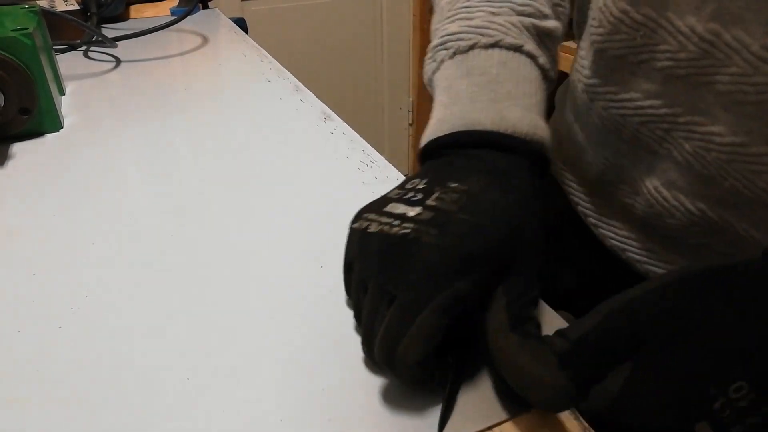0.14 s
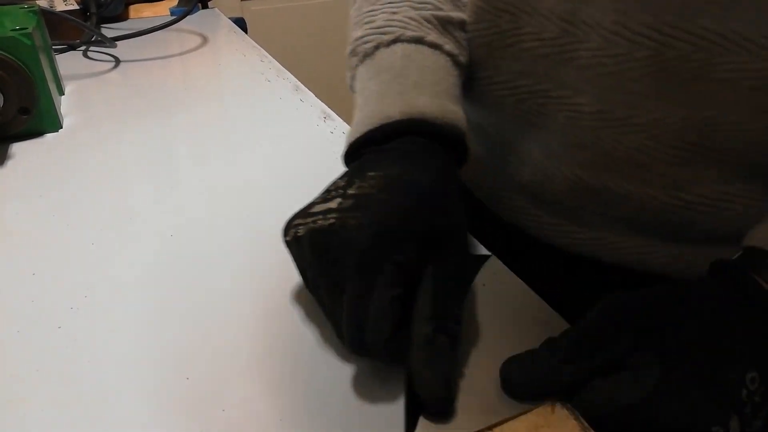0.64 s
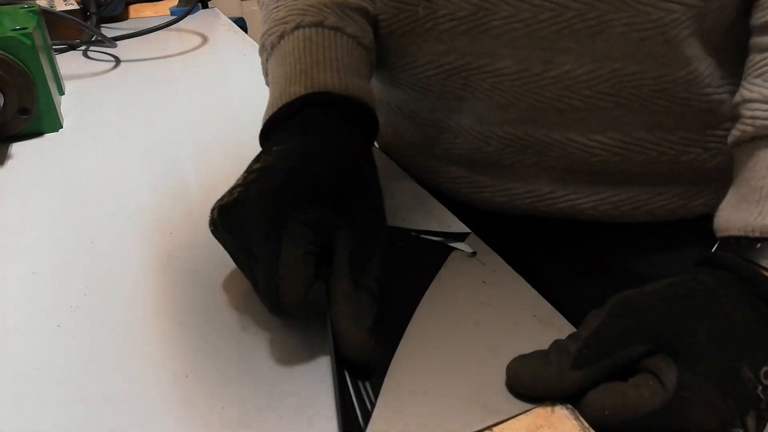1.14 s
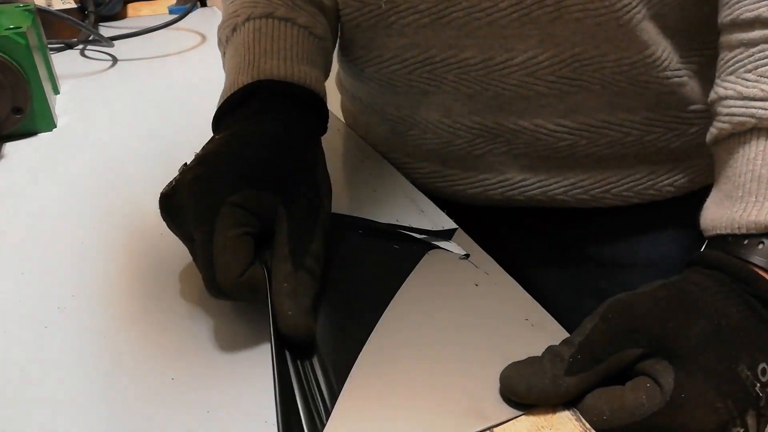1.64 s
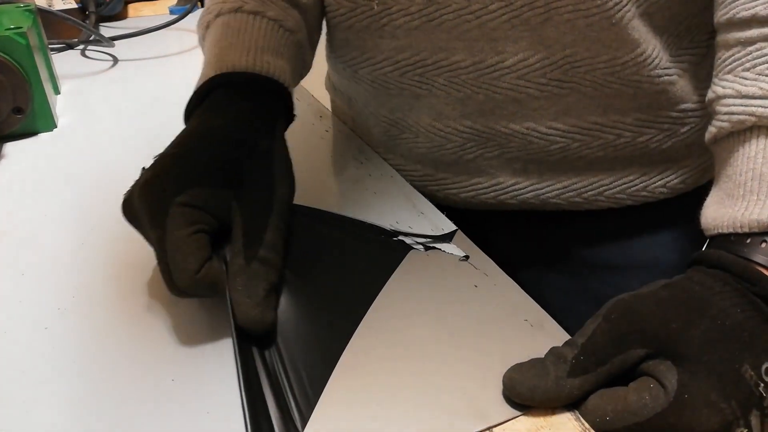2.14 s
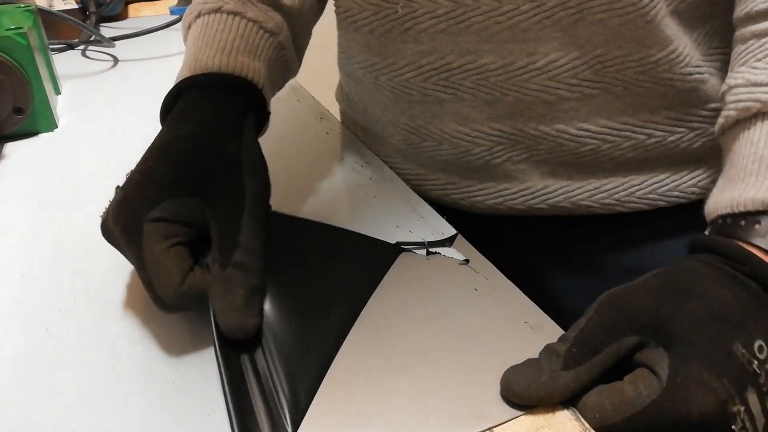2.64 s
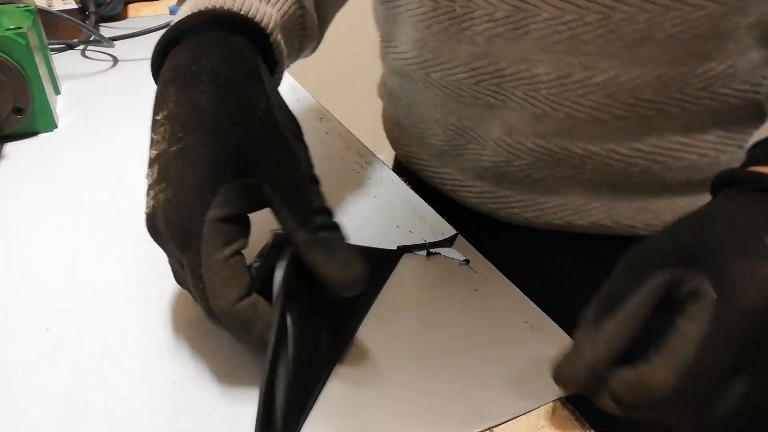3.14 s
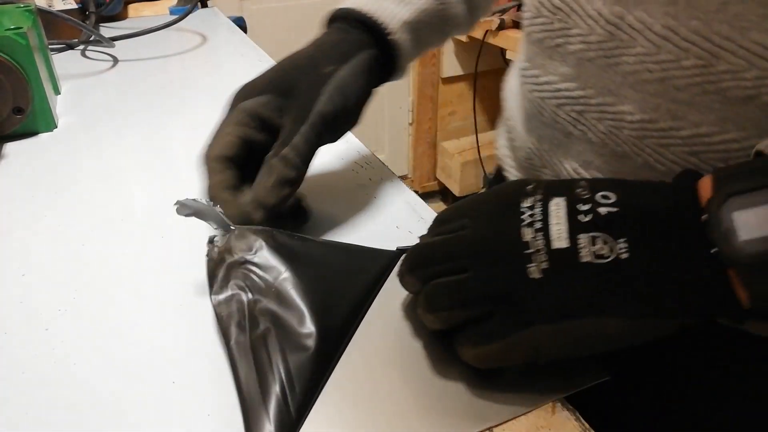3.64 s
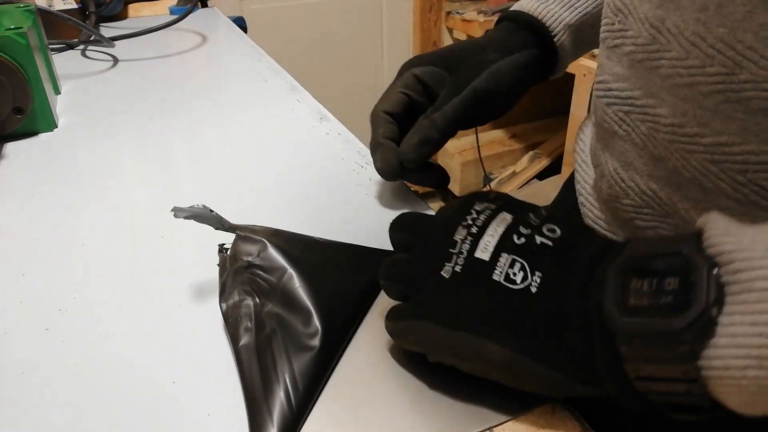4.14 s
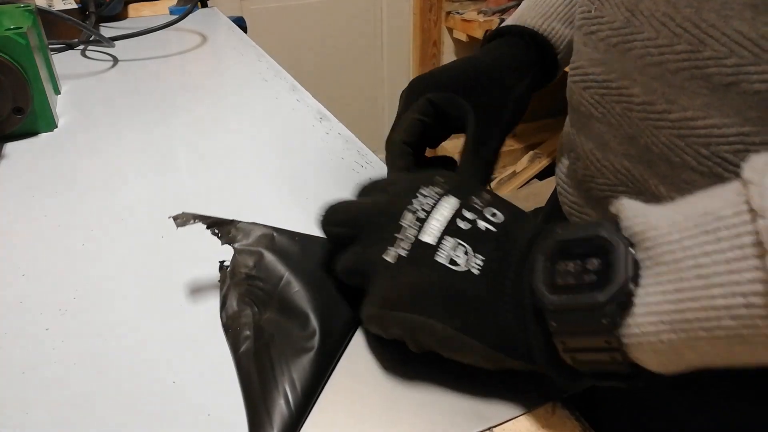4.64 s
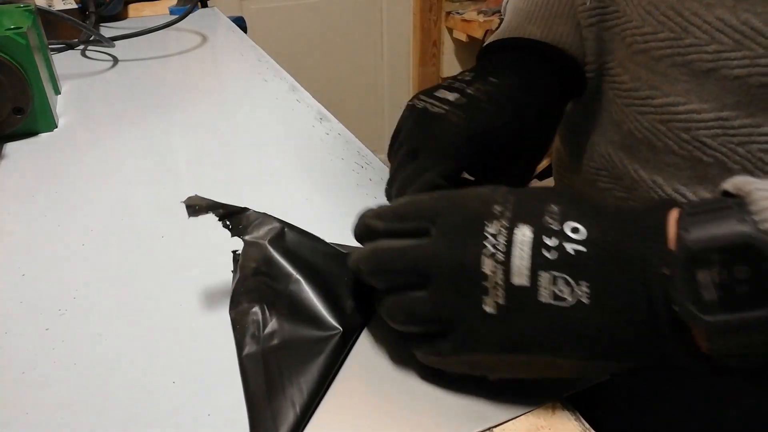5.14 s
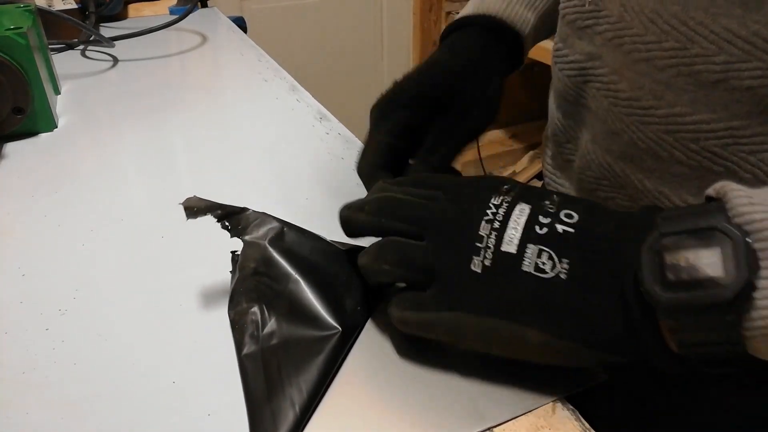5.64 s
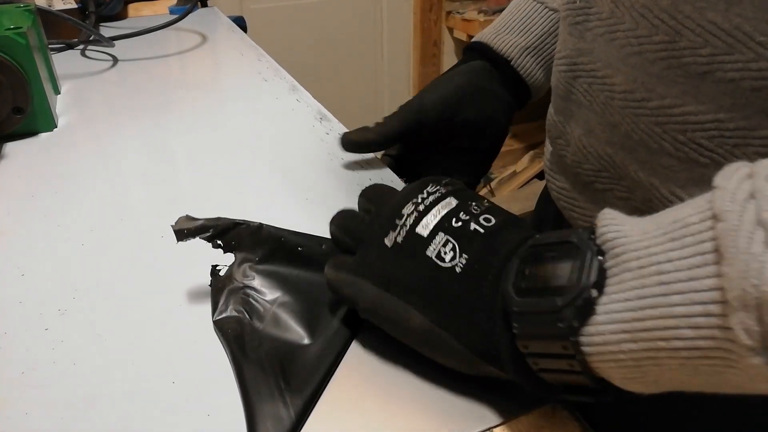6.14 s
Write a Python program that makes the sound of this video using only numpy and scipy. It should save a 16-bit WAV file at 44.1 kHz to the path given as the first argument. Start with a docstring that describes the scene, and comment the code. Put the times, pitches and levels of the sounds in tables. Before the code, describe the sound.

Adhesive film lets go of sheet metal in uneven jerks: one loud crack, a cluster of bright snaps, then thick crinkling and rustling as the film is folded back. The sheet gives soft, low booms under the hands. After a lull, gentler handling crackles and one fuller bump with a pop. Dry, close microphone in a small workshop with quiet background noise.

```python
"""A small workshop: gloved hands peel plastic film off a metal sheet on a bench, close to a two-port microphone.
The glue lets go in sharp snaps, each a short coloured flutter, over crackle made of tiny random releases.
The film squeaks and rubs; the sheet's low modes boom softly when pressed, and noise rings the bench.
Near echoes and a dense room tail answer over a faint hum and quiet, steady noise."""
import sys
import numpy as np
from scipy import signal
from scipy.fft import rfft, irfft, next_fast_len
from scipy.io import wavfile
from scipy.ndimage import uniform_filter1d

SR = 44100
rng = np.random.default_rng(int(sys.argv[2]) if len(sys.argv) > 2 else 0)


def magnitude_from_level(level_db):
    """Linear magnitude for a level in decibels (20 dB per decade)."""
    exponent = np.asarray(level_db, float) / 20
    return 10 ** exponent


def persist_wave(psi):
    """Save psi, clipped to +-1, as 16-bit WAV."""
    counts = np.round(np.clip(psi, -1, 1) * 32767).astype(np.int16)
    wavfile.write(sys.argv[1], SR, np.atleast_2d(counts).T)


N = 276683

# Glue or a crease letting go; colour columns are relative, pan is left minus right ahead of a fixed lean:
# start_s, peak_db, body_db, middle_db (at 4 kHz), pan_db
SNAPS = [(0.225, -28.5, 22, 8, -0.5), (0.274, -37, -12, -14, -2), (0.8175, -26, 2, 12, 0),
         (0.8228, -21, 10, 6, -7.5), (0.8835, -8, -5.5, -9.5, -4.5), (1.181, -32.5, 5, 2, 1),
         (1.8094, -21, 7, 6, 10.5), (1.834, -20.5, -7, -4, 5), (1.8397, -7.5, 6, 5.5, -0.5),
         (1.8997, -30, 6, 2, 15), (1.9188, -14, 4, -2, 2.5), (1.951, -12.5, -6, -3, 5),
         (1.9926, -31, 4, -11, -4), (2.0235, -24.5, 9, -6, -1.5), (2.084, -28, -17, -7, -3),
         (2.1187, -25.5, 8, -4, -1), (2.1441, -11.5, -5, -15, 0), (2.1485, -22, 20, -8, 0.5),
         (2.175, -7, -3, -11.5, 0), (2.246, -32, -4, -4, 0), (2.3108, -34, -6, -2, -4),
         (2.6035, -22, -6, 4.5, 8), (2.7576, -34, 10, 0, 0), (2.859, -22, 16, 5, -8),
         (2.9213, -25.5, -2, -19, -1), (2.934, -20, 11, -10, -3), (2.9615, -24, 3, -6, 0),
         (2.969, -21.5, 6, -2, 5), (3.1221, -28, 9, 8, -8), (3.1338, -21, 13, 8, 10),
         (3.1472, -10, 0, 6, -5.5), (3.163, -28, 14, 0, 0), (3.1943, -26, 14.5, -11, -4.5),
         (3.2884, -30, 14, 0, 0), (3.3849, -14.5, 14, 1, 1), (3.4462, -15, 5, 12, 2.5),
         (3.4705, -29, 7, 8, 0), (3.513, -19.5, 5, 13, 5), (3.548, -18, 5, 14, 3),
         (4.5895, -35, -5, -3, 13), (4.603, -29.5, -5, -8, 9.5), (4.845, -36, 18, 4.5, 1),
         (5.2796, -40.5, -9, -5, 1), (5.3238, -21.5, -43, -26, 8), (5.4633, -45, 14, 0, 0),
         (5.4842, -22, -12.5, -13.5, 3), (5.6275, -13, 4, 3, 1.5), (5.8074, -31, 14, 10, 2),
         (6.0056, -22, 6, 6, 4), (6.1163, -34, 10, 6, 0), (6.152, -30.5, 16, 4, 7)]
# The film edge rings high while taut, lower while slack: time_s, pitch_hz
EDGE_RING = [(0.23, 7000), (0.27, 9600), (2.3, 10000), (2.6, 7100), (3.4, 7760), (3.5, 8700), (5.5, 9000),
             (5.6, 7600)]
# The air pocket under the lifted film, its pitch set by the fold: time_s, pitch_hz
POCKET = [(.225, 1500), (.82, 1280), (.885, 1550), (1.84, 1650), (1.9, 1150), (1.92, 1900), (1.95, 1300),
          (2.02, 1400), (2.148, 1200), (2.175, 1750), (2.25, 1200), (2.77, 1000), (2.86, 1850),
          (2.95, 1300), (3.135, 1750), (3.17, 1650), (3.2, 1300), (3.25, 900), (3.385, 1300), (4.9, 1500),
          (5.6, 1900), (5.81, 1000), (6.15, 1300), (6.25, 1100)]
POCKET_WIDTH_HZ = 220  # half-width of the ring
# Uneven pull and handling of the film, swelling and fading, ahead of the layer trims:
# time_s, level_db, bright_db (fine crackle minus rustle)
PEEL = [(0.0, -66.5, 1), (0.11, -61, 0), (0.21, -65, -4), (0.29, -64, -10), (0.52, -62.5, 3),
        (0.77, -58, 10), (1.03, -63.5, 0), (1.3, -64.5, 4.5), (1.55, -61, -5), (1.76, -66, -10),
        (1.88, -56, -5), (1.96, -55.5, 1), (2.1, -61.5, 4), (2.31, -62, 0), (2.43, -80, 15),
        (2.572, -67.5, 6), (2.605, -54, 4), (2.68, -58, 10), (2.83, -56.5, 3), (3.04, -60.5, 9),
        (3.145, -46, -1), (3.26, -49.5, -2), (3.337, -48.5, -4), (3.425, -55.5, -5), (3.46, -46.5, -4),
        (3.542, -46, 7), (3.62, -62, 10.5), (3.7, -74, 14), (3.89, -71, -2.5), (4.54, -67, 7.5),
        (4.8, -71, -1), (5.3, -81, 14), (5.79, -74, -6), (5.88, -63, 3), (5.96, -67, 4), (6.27, -66, -8)]
# Short crumples and tugs, rise and fall over 20 dB: peak_s, rise_s, fall_s, level_db, bright_db
TUGS = [(.319, .04, 0.18, -55, -5), (.375, .1, .17, -52.5, -14.5), (0.642, .2, .11, -49.5, 10),
        (.819, .008, .35, -47.5, 1), (.89, 0.13, 0.15, -48, 11), (1.187, 0.26, .2, -59.5, -3),
        (1.84, .03, .06, -48, -6), (2.168, 0.07, 0.26, -52.5, 2), (2.362, 0.26, 0.07, -62, 10.5),
        (2.77, 0.09, .16, -48.5, -1.5), (2.903, 0.09, 0.3, -53.5, 16), (2.971, 0.0954, .075, -42.5, 3),
        (3.07, .05, 0.1, -49.5, 11.5), (4.617, .055, 0.14, -51, 8.5), (4.914, .15, .12, -53, -5.5),
        (5.039, .1, 0.17, -57, 9), (5.153, .06, .07, -56, 2), (5.582, .035, .35, -50.5, 2),
        (5.65, 0.03, 0.05, -53, -7.5), (5.74, .3, .025, -56.5, 6), (5.815, .012, .14, -51.5, -1),
        (6.013, 0.13, .1, -56, 2.5), (6.09, .04, .25, -53, 3), (6.163, .02, .06, -43.5, -1),
        (6.243, .02, .12, -55, -22)]
# Glue threads fizz on after a snap: level against its peak, ahead of the layer trim, and time to fall 20 dB
AFTER_DB, AFTER_S = -41, 0.077
# Colour of the glue threads' fine crackle: pitch_hz, level_db (per Hz, relative)
FINE_COLOUR = [(3500, -19.5), (5500, -4), (7500, -1), (10000, -2), (12800, -6), (15700, -17), (16300, -34)]
# Colour of the creases: pitch_hz, level_db (per Hz, relative)
CRINKLE_COLOUR = [(1800, -19.5), (2600, 2.5), (3300, 1.5), (4500, -0.5), (5500, -6), (7500, -35.5)]
# Colour of the slack film on metal: pitch_hz, level_db (per Hz, relative)
RUSTLE_COLOUR = [(250, -29), (450, -11), (800, -3.5), (1100, 3.5), (1700, 4.5), (2200, 0.5), (3200, -24)]
# Whistle of the rubbing film: start_s, end_s, end_pitch_hz, top_pitch_hz, level_db (rms at the top)
SQUEAK = (.38, .49, 12350, 13100, -66)
# Film dragged over an edge sings roughly: peak_s, length_s, pitch_hz, width_hz, level_db
RUBS = [(0.642, 0.048, 2940, 300, -41), (3.26, .2, 850, 600, -53), (4.63, 0.067, 3780, 400, -51.5),
        (5.16, 0.057, 3240, 400, -58), (5.819, 0.027, 10600, 910, -41)]
# The sheet bumped or flexed: peak_s, level_db, push_hz (where it is strongest), spread_octaves, t60_s
KNOCKS = [(0.291, -56, 270, 0.12, 0.38), (0.391, -53, 402, 0.7, 0.16), (0.857, -55, 260, 0.2, 0.21),
          (.995, -59, 450, .3, 0.04), (1.519, -45, 180, 0.12, 0.13), (1.63, -52, 122, 0.54, 0.63),
          (1.7, -52, 49.6, 0.19, 0.24), (1.75, -48.5, 189, 0.37, 0.26), (1.814, -44.5, 760, 0.24, 0.081),
          (1.844, -51, 407, 0.2, 0.25), (1.958, -46, 371, 0.2, 0.12), (2.033, -53, 396, 0.15, 0.16),
          (2.093, -58, 400, .2, .12), (2.126, -50, 500, .4, .1), (2.151, -45, 420, 0.3, 0.2),
          (2.183, -41, 320, 0.12, 0.15), (2.199, -53.5, 192, 0.42, 0.64), (2.41, -61, 132, 0.31, 0.32),
          (2.603, -45.5, 133, .3, 0.34), (2.776, -50, 126, 0.28, 0.31), (2.951, -51.5, 146, 0.44, 0.13),
          (3.199, -48.5, 258, 0.77, 0.23), (3.29, -51.5, 596, 0.72, 0.28), (3.911, -55.5, 159, .25, 0.6),
          (4.617, -52, 130, 0.28, 0.35), (4.722, -58, 60, 0.5, 0.56), (4.898, -57, 133, 0.59, 0.22),
          (5.553, -56, 78, 0.31, 0.11), (5.651, -44.5, 74, 0.14, 0.13), (5.653, -42.5, 760, 0.94, 0.12),
          (5.658, -39, 184, 0.46, 0.28), (5.837, -50, 253, 0.18, 0.15), (5.87, -48.5, 138, 0.31, 0.37),
          (6.256, -44.5, 150, 0.6, 0.27)]
# Low modes of the sheet: pitch_hz
SHEET_HZ = [47, 75, 102, 134, 178, 240, 279, 307, 372, 398, 432, 497, 545, 620, 720, 790, 905, 1010]
# Broad modes of the bench: pitch_hz, width_hz, level_db (relative)
BENCH = [(44, 35, -35), (99.55, 28, -14), (180, 88, 5), (278, 38, -2.5), (426, 65, -8), (710, 970, 4.5)]
# First give, then bench echoes, placed against the snap: delay_s, level_db
NEAR = [(-.0014, -19), (.0023, -12), (.0032, -16), (.0045, -15), (.0075, -21)]
# Decay of the workshop walls: pitch_hz, t60_s
SHOP = [(200, 0.39), (1000, 0.43), (4000, 0.31), (9000, 0.24), (15000, 0.05)]
# Colour difference between the ports: pitch_hz, left_minus_right_db
PORTS = [(200, 0), (700, 4), (1300, -2), (2400, 2), (4400, 4), (8100, 1), (13000, -6)]
LEAD_S = 0.00016  # the left port hears the film first
# Steady workshop hum: pitch_hz, level_db
HUM = (102.3, -79)
# Background colour: pitch_hz, level_db (per Hz, relative)
QUIET = [(20, -4.5), (49, -7), (107, -2), (337, -8.5), (527, -8.5), (1000, -10), (2320, -18),
         (11400, -22.5), (15700, -28), (16300, -44)]
QUIET_DB = -65.5  # rms of the two ports averaged
# Likeness of the background at the two ports: pitch_hz, likeness (-1 to 1)
SAME = [(60, 0.79), (130, 1), (290, 0.37), (640, -0.78), (1400, 0.41), (3100, 0.022)]


def evened(x):
    """Scales to rms 1."""
    return x / np.sqrt(np.mean(x ** 2) + 1e-20)


def read(points, hz):
    """Reads a spectrum table at the given frequencies, along a log pitch axis."""
    f, value = np.transpose(points)
    return np.interp(np.log(hz + 1), np.log(f + 1), value)


def causal(gain_db):
    """Minimum-phase impulse response with the given half-spectrum of gains."""
    log_gain = np.log(magnitude_from_level(np.maximum(gain_db, -70)))
    full = np.concatenate([log_gain, log_gain[-2:0:-1]])
    response = np.fft.ifft(np.exp(full - 1j * signal.hilbert(full).imag)).real
    return response[:len(gain_db)]


def snaps():
    """Each snap is a short flutter of the film edge with its own colour; three groups allow unlike room paths."""
    out = np.zeros((3, 2, N + 2048))
    hz = np.fft.rfftfreq(1024, 1 / SR)
    t = np.arange(40) / SR
    chance = rng.standard_normal((len(SNAPS), 2, 40))
    # The peel line lies nearer the middle, so the left port leads by two samples less
    first = np.eye(40)[[2, 0]]
    for k, ((s, peak_db, body_db, middle_db, pan_db), shake) in enumerate(zip(SNAPS, chance)):
        colour = read([(450, body_db - 18.5), (1500, body_db - 6), (4000, middle_db),
                       (8000, -4.5), (13000, -4.5), (16500, -29)], hz)
        edge_hz = np.interp(s, *np.transpose(EDGE_RING))
        colour += 8 / (1 + ((hz - edge_hz) / 1200) ** 2)
        colour += pocket(s, hz, ring_db=11)
        flutter = first + 0.3 * shake * np.exp(-t / 0.00031)  # a little different at each port
        crack = signal.fftconvolve(flutter, causal(colour)[None], axes=1)
        peak = abs(signal.hilbert(crack)).max(1, keepdims=True)
        crack = magnitude_from_level(peak_db) * crack / peak
        pan = magnitude_from_level(np.array([[pan_db + 2.5], [-3.5 - pan_db]]) / 2)
        at = round(s * SR)
        out[k % 3, :, at:at + crack.shape[1]] += crack * pan
    return out[..., :N]


def pocket(s, hz, ring_db):
    """The trapped air resonates: lift in dB around the pocket's pitch at time s."""
    pocket_hz = np.interp(s, *np.transpose(POCKET))
    return ring_db / (1 + ((hz - pocket_hz) / POCKET_WIDTH_HZ) ** 2)


def film():
    """Three sizes of crackle: glue threads, creases, the slack film on metal."""
    fine_db, crinkle_db, rustle_db = motion()
    fine = crackle(fine_db - 0.5, FINE_COLOUR, per_s=11000, spread_db=3, clump_db=1.2, alike=0.16)
    crinkle = crackle(crinkle_db - 1.7, CRINKLE_COLOUR, per_s=6000, spread_db=2.4, clump_db=2.1, alike=0.26)
    rustle = crackle(rustle_db - 2.3, RUSTLE_COLOUR, per_s=2200, spread_db=3, clump_db=2.0, alike=0.58)
    return fine + crinkle + rustle


def motion():
    """Levels of fine crackle, crinkle and rustle: pull, tugs and after-fizz add up as powers."""
    t = np.arange(0, N, 64) / SR
    lean = np.array([[.5], [0], [-.5]])  # brightness favours the fine crackle over the rustle
    s, db, bright_db = np.transpose(PEEL)
    power = magnitude_from_level(2 * (np.interp(t, s, db) + lean * np.interp(t, s, bright_db)))
    for s, rise, fall, db, bright_db in TUGS:
        drop_db = 20 * np.maximum((s - t) / rise, (t - s) / fall)
        power += magnitude_from_level(2 * (db + lean * bright_db - drop_db))
    for s, db, *_ in SNAPS:
        power[0] += (t > s) * magnitude_from_level(2 * (db + AFTER_DB - 20 * abs(t - s) / AFTER_S))  # fine crackle only
    return [np.interp(np.arange(N) / SR, t, level_db) for level_db in 10 * np.log10(power)]


def crackle(level_db, colour, per_s, spread_db, clump_db, alike):
    """Tiny releases of random size that come in clumps, rung through one colour; the ports share only part."""
    draw = rng.random((2, N))
    size = rng.exponential(1, (2, N))
    sign = np.sign(rng.standard_normal((2, N)))
    slow = uniform_filter1d(uniform_filter1d(rng.standard_normal(N), 300), 300)
    clump = magnitude_from_level(clump_db * evened(slow))
    a, b = (draw < per_s / SR) * sign * magnitude_from_level(spread_db * np.minimum(size, 5)) * clump
    both = np.array([a, alike * a + np.sqrt(1 - alike ** 2) * b])
    ring = causal(read(colour, np.fft.rfftfreq(1024, 1 / SR)))
    rung = signal.oaconvolve(both, ring[None], axes=1)[:, :N]
    return magnitude_from_level(level_db) * patchy(rung, patchy_db=2.0)


def patchy(x, patchy_db):
    """The crumpling film keeps changing shape, so its colour drifts in patches and follows the air pocket."""
    hz, s, z = signal.stft(x, SR, nperseg=256, noverlap=192)
    field = rng.standard_normal(z.shape[1:])  # one field for both ports
    field = uniform_filter1d(field, 6, 0)  # smooth over pitch, then twice over time
    field = evened(uniform_filter1d(uniform_filter1d(field, 20, 1), 20, 1))
    gain = magnitude_from_level(patchy_db * field + pocket(s, hz[:, None], ring_db=4))
    return evened(signal.istft(z * gain, nperseg=256, noverlap=192)[1][:, :N])


def rubs():
    """Short swells of friction noise inside one resonance, unlike at the two ports."""
    out = np.zeros((2, N))
    t = np.arange(N) / SR
    for s, length, hz, width, db in RUBS:
        band = signal.butter(1, [hz - width / 2, hz + width / 2], "bandpass", fs=SR, output="sos")
        swell = np.exp(-(4 * (t - s) / length) ** 2 / 2)
        out += magnitude_from_level(db) * swell * evened(signal.sosfilt(band, rng.standard_normal((2, N))))
    return out


def squeak():
    """Rubbing film gives a thin whistle whose pitch and level arch up and fall back."""
    start, end, low_hz, top_hz, db = SQUEAK
    along = np.clip((np.arange(N) / SR - start) / (end - start), 0, 1)
    arch = 4 * along * (1 - along)
    turns = np.cumsum(low_hz + (top_hz - low_hz) * arch) / SR
    return np.sqrt(2 * arch) * magnitude_from_level(db) * np.sin(2 * np.pi * turns)


def knocks():
    """A soft push swings the sheet modes nearest its own pitch; the ports catch upper modes out of step."""
    out = np.zeros((2, N + SR))
    t = np.arange(SR // 2) / SR
    hz = np.array(SHEET_HZ)[:, None]
    chance = rng.random((len(KNOCKS), len(SHEET_HZ), 2))
    # The glove's hold keeps shifting
    grip = evened(uniform_filter1d(rng.standard_normal((len(KNOCKS), len(t))), 250))
    for (s, db, push_hz, spread, t60), draw, wobble in zip(KNOCKS, chance, grip):
        share = np.exp(-(np.log2(hz / push_hz) / spread) ** 2 / 2)
        rise = 0.0025 + 2.2 / push_hz  # seconds; low pushes swell more slowly
        attack = np.sin(np.pi / 2 * np.minimum(t / rise, 1)) ** 2
        shape = magnitude_from_level(db - 60 * np.maximum(t - rise, 0) / t60) * attack
        phase = 2 * np.pi * (hz * t + draw[:, :1])
        apart = (draw[:, 1:] - .5) * hz / 200  # radians
        pair = np.array([(share * np.sin(phase + side * apart)).sum(0) for side in (1, -1)])
        pair = pair / np.linalg.norm(share)
        at = round((s - rise) * SR)
        out[:, at:at + len(t)] += np.sqrt(2) * shape * magnitude_from_level(push_hz / 400 * wobble) * pair
    return out[:, :N]


def bench(knocking):
    """The bench rattles on in its broad modes for a moment after the sheet is knocked."""
    push, other = rng.standard_normal((2, N))
    t = np.arange(8192) / SR
    linger = np.exp(-1 / (0.036 * SR))  # 36 ms smoothing of the knocking power
    drive = np.sqrt(signal.lfilter([1 - linger], [1, -linger], (knocking ** 2).mean(0)))
    modes = np.zeros(len(t))
    for hz, width, db in BENCH:
        decay = np.exp(-np.pi * width * t)
        modes += magnitude_from_level(db) * np.sqrt(width) * decay * np.sin(2 * np.pi * hz * t)
    both = np.array([push + 0.37 * other, push - 0.16 * other])
    rattle = evened(signal.oaconvolve(both, modes[None], axes=1)[:, :N])
    return magnitude_from_level(-4.5) * drive * rattle


def near_echoes(direct):
    """A first give just ahead of each snap and short bench echoes after it, flipping sign in turn."""
    return sum(magnitude_from_level(db) * (-1) ** k * np.roll(direct, round(s * SR), 1) for k, (s, db) in enumerate(NEAR))


def shop(x, scatter_t60, scatter_db, walls_db):
    """Dense scatter off hands and bench, then the walls; sparse taps, other ones per port."""
    length = SR // 2
    taps = np.zeros((2, length))
    at = np.arange(40, length - 10, 10) + rng.integers(0, 10, (2, (length - 41) // 10))
    np.put_along_axis(taps, at, rng.choice([-1., 1.], at.shape), 1)
    scatter = taps * magnitude_from_level(-60 * np.arange(length) / SR / scatter_t60)
    hz, t, z = signal.stft(taps, SR, nperseg=256)
    decay = magnitude_from_level(-60 * t / read(SHOP, hz)[:, None])
    walls = signal.istft(z * decay, SR, nperseg=256)[1][:, :length]
    tail = magnitude_from_level(scatter_db) * scatter / np.linalg.norm(scatter[0])
    tail = tail + magnitude_from_level(walls_db) * walls / np.linalg.norm(walls[0])
    return signal.fftconvolve(x, tail, axes=1)[:, :N]


def ports(x):
    """Each port has its own colour and the right one hears a little late."""
    size = next_fast_len(N + 64)
    hz = np.fft.rfftfreq(size, 1 / SR)
    half = magnitude_from_level(read(PORTS, hz) / 2)
    late = np.exp(-2j * np.pi * hz * LEAD_S)
    return irfft(rfft(x, size) * np.array([half, late / half]), size)[:, :N]


def hum():
    """A faint steady sine hums in the workshop, the same at both ports."""
    hz, db = HUM
    return np.sqrt(2) * magnitude_from_level(db) * np.sin(2 * np.pi * hz * np.arange(N) / SR)


def quiet():
    """Steady noise of the workshop and the microphone, its likeness between ports set by pitch."""
    hz = np.fft.rfftfreq(2048, 1 / SR)
    a, b, c, d = rng.standard_normal((N // 512 + 5, 1025, 4)).T
    same = np.clip(read(SAME, hz), -1, 1)[:, None]
    left = a + 1j * b
    right = same * left + np.sqrt(1 - same ** 2) * (c + 1j * d)
    z = np.array([left, right]) * magnitude_from_level(read(QUIET, hz))[:, None]
    both = signal.istft(z, nperseg=2048, noverlap=1536)[1][:, :N]
    return magnitude_from_level(QUIET_DB) * both / np.std(both.mean(0))


def scene():
    """All sources in the workshop; only the snaps feed the echoes and the room."""
    cracks, sheet = snaps(), knocks()
    direct = cracks.sum(0)
    room = sum(shop(x, scatter_t60=0.027, scatter_db=-8.5, walls_db=-10.5) for x in cracks)
    hands = film() + rubs() + squeak() + sheet + bench(sheet)
    return ports(direct + near_echoes(direct) + room + hands) + hum() + quiet()


def top_cut(x):
    """Nothing passes above the cut-off."""
    return signal.sosfilt(signal.butter(12, 16820, fs=SR, output="sos"), x)


def record(dry):
    """Limits the band to 16.5 kHz and finishes the mix."""
    limited = signal.oaconvolve(dry, signal.firwin(255, 16500, fs=SR)[None], "same")
    return top_cut(limited)


dry = scene()
out = record(dry)
persist_wave(out)
```